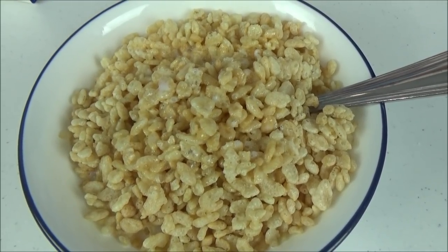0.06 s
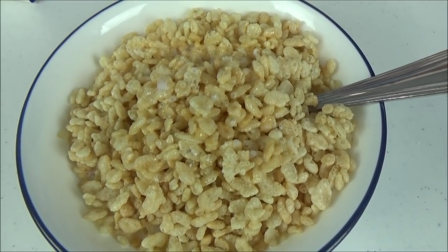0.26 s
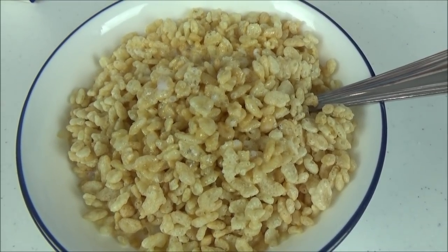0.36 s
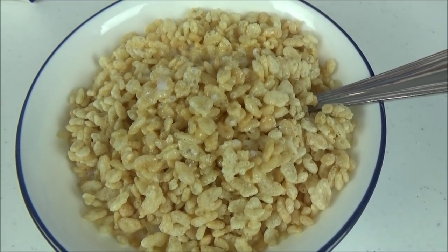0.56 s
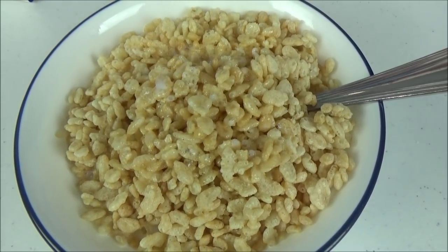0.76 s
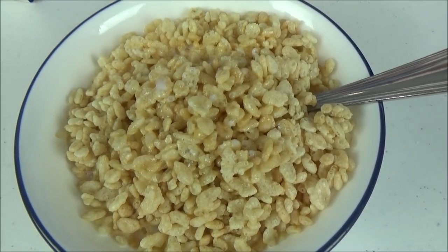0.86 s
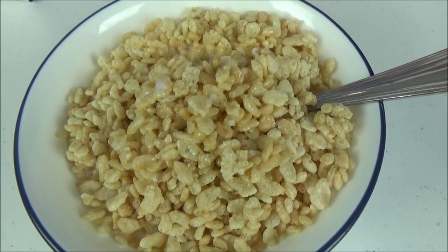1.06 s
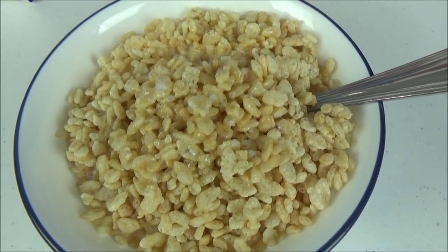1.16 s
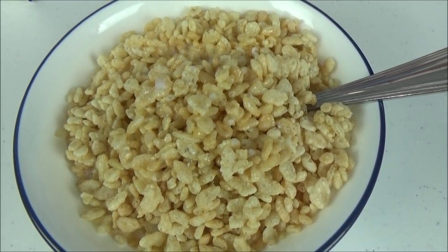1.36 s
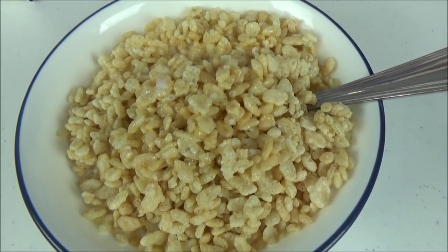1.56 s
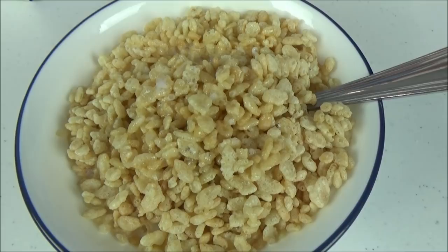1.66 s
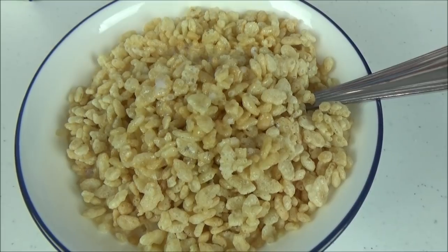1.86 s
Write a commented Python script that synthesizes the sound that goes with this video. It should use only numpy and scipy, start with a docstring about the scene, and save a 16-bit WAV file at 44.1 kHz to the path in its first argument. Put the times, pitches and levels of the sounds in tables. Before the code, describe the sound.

Puffed cereal crackling in milk, tiny bright irregular snaps over fine fizz in a quiet room

```python
"""Puffed cereal crackles in a bowl of milk: soaked grains crack in tiny bright snaps, each a few cycles long.
Under the snaps lies a fine fizz of fainter cracks, scattered at random in time, pitch and place.
Foam seethes faintly as a blur of tiny noise bursts, and one small bubble rings with two dying tones.
All these scatter briefly in the bowl and the room. Three dull knocks, and low thuds under three of the
snaps, are damped thumps with a faint ring. Behind lies room noise: bands of random noise and a low hum."""
import sys
import numpy as np
from scipy import signal
from scipy.io import wavfile

SR = 44100
rng = np.random.default_rng(int(sys.argv[2]) if len(sys.argv) > 2 else 0)


def transcribe(u):
    """Save the signal u as a 16-bit wav file named by the first command-line argument.

    u: samples, shape (n,) or (channels, n), limited to [-1, 1]; the rate is SR.
    q: integer samples, one column per channel.
    """
    v = np.clip(np.atleast_2d(u).T, -1, 1)
    q = np.round(v * 32767).astype(np.int16)
    wavfile.write(sys.argv[1], SR, q)


N = 83790  # length in samples, 1.9 s


def from_db(db):
    """Turn decibels into a gain."""
    return 10 ** (np.asarray(db) / 20)


def at_hz(points, hz):
    """Read a table between its points, with pitch on a logarithmic scale."""
    table_hz, values = np.transpose(points)
    return np.interp(np.log(hz), np.log(table_hz), values)


def over_time(points):
    """Draw a table of times and levels as a curve over the whole sound."""
    return np.interp(np.arange(N) / SR, *np.transpose(points))


def low_pass(x, hz):
    """Soften a sound by taking away its treble."""
    return signal.sosfilt(signal.butter(2, hz, fs=SR, output="sos"), x)


def band(x, low_hz, high_hz):
    """Keep only what lies between two pitches, with two resonant stages."""
    high_hz = np.clip(high_hz, 20, .45 * SR)
    low_hz = np.clip(low_hz, 10, .97 * high_hz)
    return signal.sosfilt(signal.butter(2, [low_hz, high_hz], "band", fs=SR, output="sos"), x)


def add(out, start_s, sound):
    """Mix a short sound in at a given time."""
    i = int(np.clip(start_s * SR, 0, N - 1))
    out[..., i:i + sound.shape[-1]] += sound[..., :N - i]


def pan(left_minus_right_db):
    """Place a sound by making one ear louder and the other softer."""
    return from_db(left_minus_right_db * np.array([[.5], [-.5]]))


def cycles(hz, octaves, size):
    """A short burst of a few cycles, fewer the wider its band; peak 1."""
    wave = band(signal.unit_impulse(size), hz * 2 ** (-octaves / 2), hz * 2 ** (octaves / 2))
    return wave / np.abs(wave).max()


def ring(modes, size=4096):
    """Pure tones that start together and die away, each at its own rate."""
    t = np.arange(size) / SR
    out = np.zeros(size)
    for k, (hz, db, t60) in enumerate(modes):
        sign = (-1) ** k
        out += sign * from_db(db - 60 * t / t60) * np.sin(2 * np.pi * hz * t)
    return out


def scatter(x, level_db, t60, delay, width, uneven_db=5):
    """Reflections of uneven strength that die away, partly different in each ear."""
    t = np.arange(SR // 4) / SR
    mid, side, strength = rng.standard_normal((3, len(t)))
    fade = from_db(uneven_db * strength - 60 * t / t60) * (t >= delay)
    tail = (mid + width * side * [[1], [-1]]) * fade
    tail /= np.sqrt(np.sum(tail ** 2) / 2 + 1e-20)
    return from_db(level_db) * signal.fftconvolve(np.atleast_2d(x), tail, axes=1)[:, :N]


# room noise and far hiss, relative strength by pitch: (f/Hz, level/dB per Hz)
FLOOR = [(22, -16), (40, -6), (60, -9.5), (80, -7), (125, 0), (200, -2), (330, -3.5), (550, -7),
         (1000, -7.5), (2000, -13), (4500, -16.5), (7500, -16), (9200, -20), (11000, -18), (13000, -27),
         (16000, 9)]
# how alike the noise is in the two ears: (f/Hz, likeness from -1 to 1)
LIKENESS = [(40, 0.78), (130, 1), (350, 0.5), (800, 0.12), (2500, 0.1), (6000, 0.61), (13000, 1)]
# steady hum tones: (f/Hz, level/dB rms)
HUM = [(58.5, -78), (120, -77), (336, -78)]
FLOOR_DB = -62  # rms of the noise without the hum


def room_noise():
    """Steady air noise in half-octave bands, with a faint hum of pure tones."""
    edges = 22 * 2 ** np.arange(0, 10, .5)  # Hz
    # neighbouring bands take turns with two independent noises
    white = rng.standard_normal((2, 2, N + SR // 4))
    air = 0
    for k, (low, high) in enumerate(zip(edges, edges[1:])):
        mid, side = band(white[k % 2], low, high)[:, -N:]  # drop the filter's start
        hz = np.sqrt(low * high)
        alike = np.clip(at_hz(LIKENESS, hz), -1, 1)
        stereo = np.sqrt(1 + alike) * mid + np.sqrt(1 - alike) * side * [[1], [-1]]
        air = air + from_db(at_hz(FLOOR, hz)) * stereo
    t = np.arange(N) / SR
    hum = np.zeros(N)
    for hz, db in HUM:
        hum += np.sqrt(2) * from_db(db) * np.sin(2 * np.pi * (hz * t + rng.random()))
    return from_db(FLOOR_DB) * air / air.std() + hum


# dull knocks, and the low thuds under three of the snaps, level before softening:
# (t/s, level/dB, f/Hz, softening low-pass f/Hz)
THUMPS = [(.138, -44, 800, 1700), (.2238, -50.5, 656, 990), (0.4213, -40, 920, 1380),
          (.559, -24.5, 1500, 6040), (0.6882, -34.5, 1280, 1750), (1.3582, -48, 430, 600)]
# faint ring added to each thump, level relative to it: (f/Hz, level/dB, time to fall 60 dB/s)
THUMP_MODES = [(378, -29, 0.056), (712, -22, .025), (960, -17, .024), (1125, -18, .03), (1307, -17, .026),
               (1735, -15, 0.018), (2216, -16, .02), (3500, -9, .012), (4200, -8, 0.0051)]
# a thump's reflections from bowl and table: (delay t/s, level/dB)
THUMP_ECHOES = [(.0031, -15), (.0063, -13)]
THUMP_OCTAVES = 1.1  # bandwidth
THUMP_LAG_S = 0.00016  # how much later the left ear hears it
THUMP_SCATTER_DB, THUMP_SCATTER_T60_S = -6, 0.037


def knocks_and_thuds(size=4096):
    """Damped thumps with a faint ring and close reflections, reaching the left ear a little later."""
    direct = np.zeros(N)
    for start_s, db, hz, soft_hz in THUMPS:
        thump = cycles(hz, THUMP_OCTAVES, size) + ring(THUMP_MODES, size)
        add(direct, start_s, from_db(db) * low_pass(thump, min(soft_hz, SR / 3)))
    t = np.arange(N) / SR
    echoed = direct.copy()
    for delay, db in THUMP_ECHOES:
        echoed += from_db(db) * np.interp(t - delay, t, direct)
    left = np.interp(t - THUMP_LAG_S, t, echoed)
    blur = scatter(direct, THUMP_SCATTER_DB, THUMP_SCATTER_T60_S, delay=0.00053, width=0.74)
    return np.array([left, echoed]) + blur


# the tones of a small bubble, level at their start: (f/Hz, level/dB, time to fall 60 dB/s)
BUBBLE = [(2190, -45, 0.042), (3980, -47, .009)]
BUBBLE_S = 1.8878  # when it opens


def bubble():
    """One bubble opens in the milk and rings with tones that die away."""
    out = np.zeros(N)
    add(out, BUBBLE_S, ring(BUBBLE))
    return out


# how strongly the foam seethes, before reflections: (t/s, level/dB rms)
SEETHE = [(0, -77), (.09, -99), (.14, -64), (.19, -89), (.31, -68), (.39, -80), (.54, -67), (.63, -69.5),
          (.89, -69), (1.06, -82), (1.42, -74), (1.58, -70), (1.83, -88), (1.89, -60.5)]
SEETHE_PER_S, SEETHE_HZ, SEETHE_OCTAVES = 1500, 9100, 0.38  # bursts per second, pitch, bandwidth


def seethe():
    """Minute bursts in the foam, too dense to tell apart, swelling and fading."""
    bursts = (rng.random(N) < SEETHE_PER_S / SR) * rng.standard_normal(N)
    foam = np.convolve(bursts, cycles(SEETHE_HZ, SEETHE_OCTAVES, size=256))[:N]
    return from_db(over_time(SEETHE)) * foam / foam.std()


BODY_OCTAVES = 1.017  # bandwidth of a crack's lower body


def crack(hz, octaves, body_hz, body_db, size=256):
    """One grain wall breaks: a few bright cycles and a lower body."""
    bright = cycles(hz, octaves, size)
    body = cycles(body_hz, BODY_OCTAVES, size)
    return bright + from_db(body_db) * body


# how lively the faint crackle is, in both rate and strength: (t/s, level/dB)
ACTIVITY = [(0, 0), (.35, 1), (.55, 2.5), (.95, -0.5), (1.05, -2), (1.3, -2.5), (1.6, 2), (1.9, 1)]
FIZZ_PER_S, FIZZ_DB, FIZZ_SPREAD_DB = 450, -61, 4.5  # rate and weakest level at 0 dB activity
FIZZ_HZ, FIZZ_PITCH_SPREAD, FIZZ_OCTAVES = 9000, 0.22, 0.42  # pitch spread and bandwidth in octaves
FIZZ_PAN_DB = 2.5  # spread between the ears
FIZZ_BODY_HZ, FIZZ_BODY_DB, FIZZ_BODY_SPREAD_DB = 3780, -8.5, 3.5


def fizz(count=40):
    """Faint cracks at random all over the bowl, from grains of many sizes; some ring longer than others."""
    activity_db = over_time(ACTIVITY)
    born = rng.random(N) < FIZZ_PER_S * from_db(activity_db) / SR
    extra_db = FIZZ_SPREAD_DB * np.minimum(rng.exponential(1, N), 3)
    sizes = from_db(FIZZ_DB + activity_db + extra_db) * rng.choice([-1, 1], N)
    # each crack is dealt one of a set of random grains
    dealt = rng.integers(0, count, N)
    out = 0
    for k in range(count):
        place, body, body_pitch, pitch, width = rng.standard_normal(5)
        grain = crack(FIZZ_HZ * 2 ** (FIZZ_PITCH_SPREAD * pitch), FIZZ_OCTAVES * 2 ** (width / 2),
                      FIZZ_BODY_HZ * 2 ** (body_pitch / 2), FIZZ_BODY_DB + FIZZ_BODY_SPREAD_DB * body)
        cracks = np.convolve(born * sizes * (dealt == k), grain)[:N]
        out = out + pan(FIZZ_PAN_DB * place) * cracks
    return out


# grains cracking, level of the bright part and of the body relative to it:
# (t/s, peak level/dB, f/Hz, bandwidth/octaves, body f/Hz, body level/dB, left minus right level/dB)
SNAPS = [(0.0048, -29, 9800, 0.65, 2340, -22, 1), (0.0405, -34.5, 9000, 1, 3000, -32, -8),
         (0.044, -26.5, 9000, 0.42, 4330, -11.5, 2), (0.0665, -33, 8900, 0.4, 4350, -6, 3),
         (0.0838, -27, 7640, 1, 2880, -26, -4.5), (0.087, -34.5, 9300, 0.57, 3220, -16, 3),
         (0.095, -38, 7750, 0.95, 1500, -30, -1), (0.1604, -34.5, 8050, 0.96, 1500, -37, 1),
         (0.2236, -30, 9100, 0.24, 1470, -12.5, 0), (0.2246, -16, 11600, 0.31, 6140, -7, -1),
         (0.2347, -27, 9500, 0.65, 1900, -40, 3), (0.2506, -30.5, 7200, 0.41, 2800, -13.5, 2),
         (0.2551, -39, 6500, 0.55, 2200, -8, -4), (0.308, -38, 9250, 0.38, 3000, -17, 0),
         (0.316, -35, 8550, 0.47, 2860, -4.5, 1), (0.3301, -31.5, 9700, 1.1, 1920, -17.5, 1),
         (0.3592, -41, 8900, 0.6, 2500, -20, 0), (0.3925, -41, 12000, 0.6, 2500, -24, 0),
         (0.4217, -17.5, 9580, 0.39, 2580, -10.5, -2.5), (0.43, -30.5, 8000, 1.5, 1500, -27, 0),
         (0.4726, -50, 5750, 1, 3000, -3, -1), (0.4754, -29, 6040, 1.3, 1500, -45, -4.5),
         (0.4764, -49, 6200, 0.8, 3230, -7, -1), (0.4802, -26.5, 6540, 0.75, 2780, -15.5, -2),
         (0.534, -40, 9800, 0.59, 2800, -10, -1), (0.5413, -35, 10200, 0.76, 1450, -17, -1),
         (0.5848, -31.5, 8100, 0.37, 1920, -17, 1.5), (0.615, -36.5, 8800, 1, 1900, -14.5, 1),
         (0.6752, -34.5, 7940, 0.83, 2210, -5, 0), (0.6774, -36.5, 8400, 0.65, 2720, -8.5, 9),
         (0.698, -31, 6900, 0.9, 1490, -18, 1), (0.7474, -38.5, 7200, 0.87, 2760, -7.5, 6),
         (0.7662, -6, 9220, 1.07, 3080, -22, -1), (0.8125, -32.5, 11400, 0.74, 1490, -32, 2),
         (0.8409, -27, 8200, 0.71, 2360, -32, 17), (0.8426, -13, 7500, 0.92, 2550, -12, 1),
         (0.8894, -41, 10000, 0.42, 2800, -14, 4), (0.8996, -34, 11000, 1, 1900, -30, 0),
         (0.9103, -34.5, 8450, 0.45, 1900, -28, -4), (0.9352, -33.5, 6750, 1.05, 2010, -8.5, 3.5),
         (0.9451, -34, 8000, 1.2, 1900, -15, -4), (0.982, -38, 7250, 0.83, 1900, -19, 3),
         (0.9925, -35.5, 8650, 0.56, 2300, -27, 5), (0.9997, -41, 9750, 0.91, 1500, -33, -1),
         (1.1164, -41.5, 9250, 0.76, 2860, -10, -1), (1.1722, -34, 9950, 0.55, 2330, -20, 0),
         (1.2531, -33, 6300, 0.89, 2010, -12.5, 0), (1.2947, -35.5, 9250, 0.49, 2800, -22, 2.5),
         (1.3198, -42, 9100, 0.6, 2500, -20, 0), (1.3581, -29, 8400, 0.68, 1770, -11.5, 1),
         (1.4039, -37.5, 9250, 0.81, 1850, -33, 0), (1.4518, -26, 8900, 0.44, 4200, -13.5, 1.5),
         (1.4989, -32, 7940, 0.43, 3340, -12, 2.5), (1.5023, -38, 5500, 0.66, 1970, -6, -1),
         (1.5534, -40.5, 9500, 0.85, 1500, -16, -1), (1.5728, -37.5, 8500, 0.48, 2760, -9, 5),
         (1.6, -38, 8250, 0.32, 4260, -2, 8), (1.6082, -12.5, 8530, 0.42, 2700, -16.5, -1.5),
         (1.6424, -33, 7750, 1.3, 1500, -34, -3), (1.6746, -29.5, 7800, 0.84, 2280, -28, 1.5),
         (1.7266, -42.5, 7400, 0.7, 2800, -13, -4), (1.728, -43, 7440, 0.7, 2800, -15, 1),
         (1.7501, -36, 8650, 1.2, 1500, -28, -1), (1.762, -38, 9800, 0.77, 2500, -18, 0),
         (1.7758, -29, 7200, 1.15, 2650, -15, 0), (1.783, -38.5, 8500, 0.75, 3400, -10, -7),
         (1.7897, -33, 9250, 1.5, 1500, -23, 2), (1.8068, -38, 6200, 0.63, 2400, -25, -3),
         (1.8083, -28, 7600, 1.4, 1460, -28, 3.5), (1.8128, -34.5, 8200, 1.4, 1500, -28, -4),
         (1.8751, -32, 7900, 1.3, 1900, -18, 0)]


def snaps():
    """The cracks that stand out singly, each from its own place in the bowl."""
    out = np.zeros((2, N))
    for start_s, db, hz, octaves, body_hz, body_db, pan_db in SNAPS:
        add(out, start_s, from_db(db) * pan(pan_db) * crack(hz, octaves, body_hz, body_db))
    return out


# scatter among the grains and the bowl's wall, then the room
BOWL_DB, BOWL_T60_S, BOWL_DELAY_S, BOWL_WIDTH = -9.5, 0.018, 0.00039, 0.4
ROOM_DB, ROOM_T60_S, ROOM_DELAY_S, ROOM_WIDTH = -21.5, 0.13, .006, 0.37


def scene():
    """The crackling bowl with its reflections, in the room."""
    cereal = snaps() + fizz() + seethe() + bubble()
    bowl = scatter(cereal, BOWL_DB, BOWL_T60_S, BOWL_DELAY_S, BOWL_WIDTH)
    room = scatter(cereal, ROOM_DB, ROOM_T60_S, ROOM_DELAY_S, ROOM_WIDTH)
    return cereal + bowl + room + knocks_and_thuds() + room_noise()


CUTOFF_HZ = 16100


def record(dry):
    """Cut the very top of the treble steeply."""
    top_cut = signal.firwin(127, CUTOFF_HZ, fs=SR, window=("kaiser", 8))
    return signal.fftconvolve(dry, top_cut[None], "same", axes=1)


dry = scene()
out = record(dry)
transcribe(out)
```